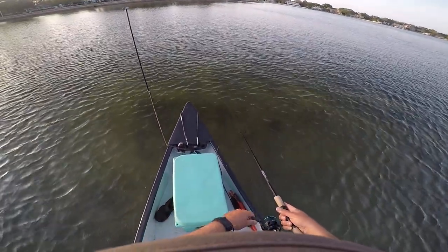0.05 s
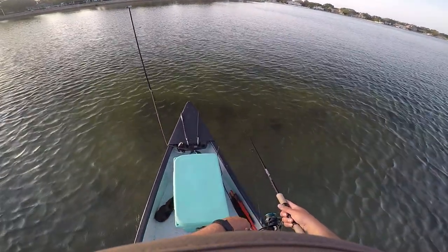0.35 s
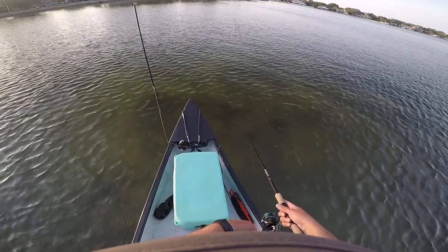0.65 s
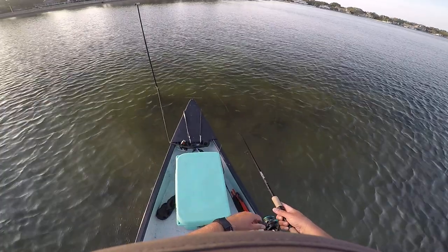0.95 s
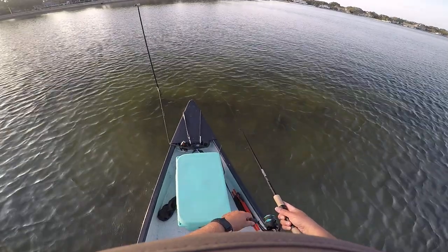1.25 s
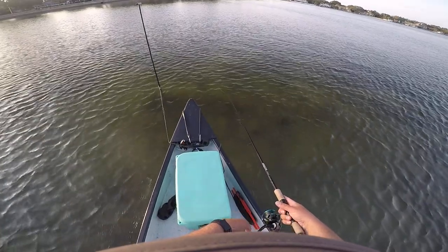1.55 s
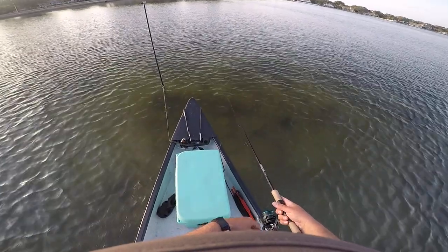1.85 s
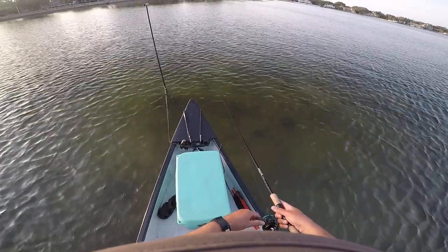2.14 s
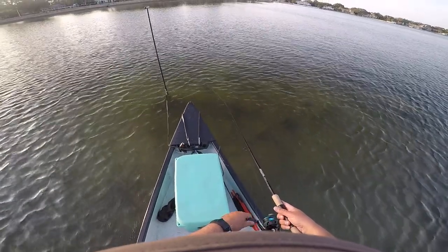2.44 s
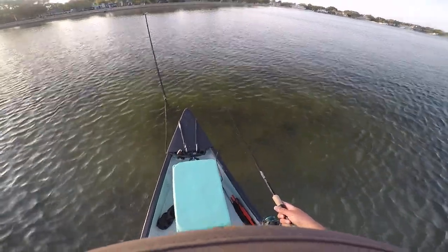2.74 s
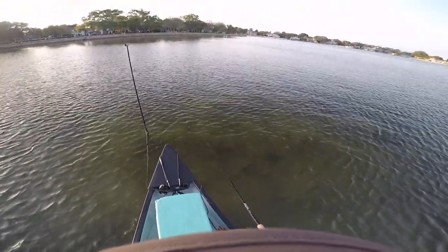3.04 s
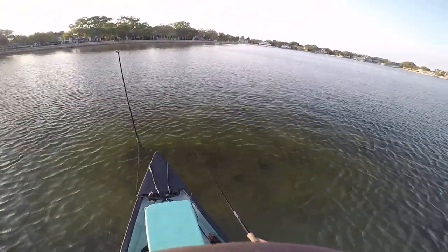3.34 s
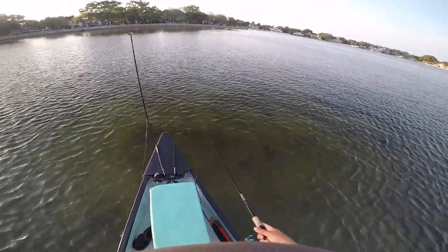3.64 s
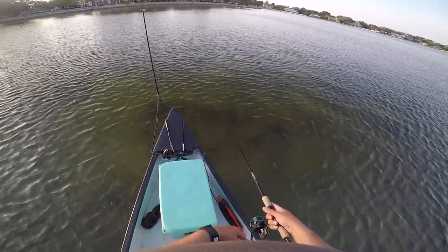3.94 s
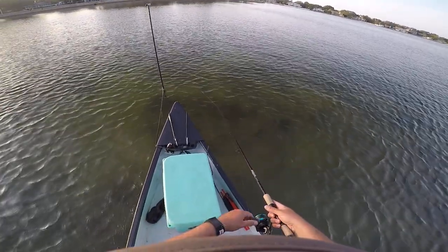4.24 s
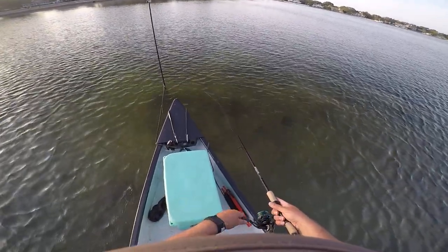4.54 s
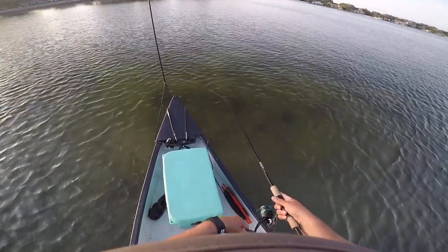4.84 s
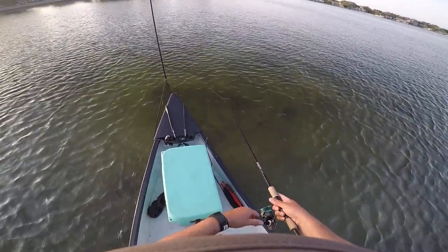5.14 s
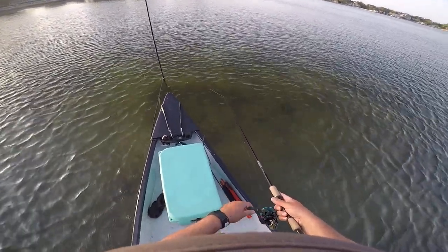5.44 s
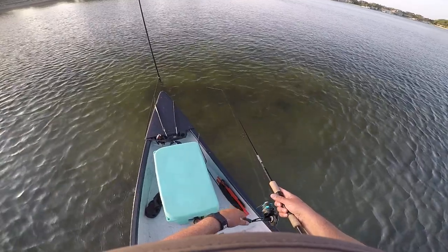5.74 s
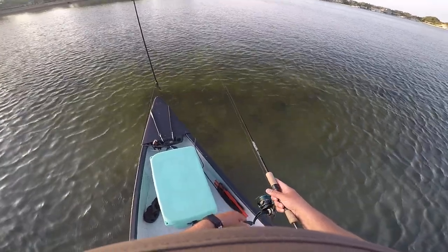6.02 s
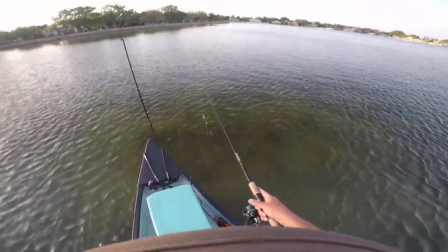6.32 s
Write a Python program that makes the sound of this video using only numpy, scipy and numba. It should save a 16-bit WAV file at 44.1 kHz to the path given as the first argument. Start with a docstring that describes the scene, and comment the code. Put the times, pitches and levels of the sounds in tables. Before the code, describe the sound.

Two gulls call close by, with more calling further off, over soft rippling water, a low drone and wind buffeting the microphone.

```python
"""Open shallow water, from a small boat: two gulls call close by, many more further off.
Each voice is a stack of syrinx harmonics coloured by throat and beak, with a faint echo off the shore.
Gusts buffet the two ports of a body-worn microphone and duck its gain; fishing tackle ticks now and then.
Underneath lies a bed of rippling water and a low, distant drone."""
import sys
import numpy as np
from scipy import signal
from scipy.fft import rfft, irfft
from scipy.io import wavfile
from scipy.ndimage import uniform_filter1d, minimum_filter1d
from numba import njit

SR = 44100
rng = np.random.default_rng(int(sys.argv[2]) if len(sys.argv) > 2 else 0)


def to_wav(sig):
    """Store sig (one row per channel, or 1-D mono) as 16-bit WAV at the path in sys.argv[1].

    Samples outside -1..1 are clipped; the rate is SR.
    """
    pcm = np.clip(np.atleast_2d(sig), -1, 1) * 32767
    pcm = np.round(pcm).astype(np.int16)
    wavfile.write(sys.argv[1], SR, pcm.T)  # frames by channels


N = 285768
TIME = np.arange(N) / SR

# hush of ripples and far shore: f/Hz, relative left level/dB, relative right level/dB
WASH_COLOUR = [(60, -77, -75.5), (256, -73.5, -71), (380, -75, -74), (570, -78, -77.5), (880, -70.5, -74.5),
               (1242, -73, -81.5), (1880, -80, -88.5), (2480, -86, -86.5), (3340, -91.5, -93),
               (5200, -94.5, -95.5), (9630, -101, -100), (10600, -103, -102), (12900, -111, -110),
               (15000, -122, -122)]
# fader ride of the drone: t/s, level/dB
DRONE_RIDE = [(0, -38.5), (.9, -38.5), (1.5, -39.5), (1.9, -38.5), (2.2, -33), (2.45, -34.5), (2.6, -41.5),
              (2.9, -31), (3.3, -34.5), (4.5, -36.5), (6.48, -41)]
# tone of the drone: f/Hz, relative level/dB
DRONE_COLOUR = [(40, -52), (95, -62), (120, -17.5), (142, 2.5), (175, 1.5), (230, -1.5), (290, -7.5),
                (370, -18.5), (600, -46.5), (2000, -100)]
# breeze between gusts: t/s, relative level/dB, eddy corner/Hz
BREEZE = [(0, -29, 145), (.6, -31.5, 128), (.9, -42, 133), (1.8, -48.5, 140), (2.65, -55, 140),
          (2.95, -37, 143), (3.3, -22, 183), (3.6, -19.5, 195), (4.1, -22, 132), (4.8, -22.5, 100),
          (5.1, -30, 104), (5.6, -25.5, 111), (6.0, -23.5, 102), (6.48, -22.5, 101)]
# gusts on the ports: t/s, length/s, relative left level/dB, relative right level/dB, eddy corner/Hz
GUSTS = [(0.39, 0.064, -49, -28, 125), (3.277, 0.12, -16.5, -36, 212), (3.39, 0.065, -24, -11.5, 233),
         (3.499, 0.031, -22, -13, 215), (3.641, 0.35, -27, -13.5, 267), (4.173, 0.029, -24, -10.5, 218),
         (4.197, 0.066, -17.5, -4.5, 295), (4.302, 0.19, -20.5, -4, 364), (4.508, 0.14, -20, -10.5, 209),
         (4.786, 0.062, -18.5, -37, 88), (5.174, 0.098, -13.5, -24, 143), (5.332, 0.043, -17.5, -34, 109),
         (5.368, 0.11, -32, -20.5, 195), (5.724, 0.074, -20.5, -12.5, 212), (5.843, 0.042, -17, -10.5, 232),
         (5.932, 0.16, -16.5, -17, 101), (6.019, 0.038, -31, -12.5, 176), (6.395, 0.035, -22, -14, 160)]
# notes of the flock: t/s, length/s, mid pitch/Hz, slide/Hz, arch above the ends/Hz, relative level/dB,
# tilt/(dB per octave), roughness/0-1, beak resonance/Hz, beak boost/dB, top edge/Hz
FLOCK_NOTES = [(-0.03, 0.1, 1038, 114, 0, -61.5, -2, .05, 4600, 8, 6000),
               (0.065, 0.074, 1063, -150, 88, -56.5, -4.5, 0.03, 5300, -3, 7000),
               (0.316, 0.045, 1027, -110, 58, -55, -6, 0.13, 3880, 4, 6000),
               (0.356, 0.079, 1015, -240, 41, -51.5, -3, 0.1, 5180, 8, 7500),
               (0.436, 0.15, 960, 104.5, 74.5, -55, -0.5, 0.18, 1900, 8, 7500),
               (1.07, 0.032, 840, -61, 8, -49, -17, .1, 2500, 3, 5000),
               (1.092, 0.056, 980, -160, 30, -50.5, 0, 0.17, 4000, -1, 6000),
               (1.12, 0.044, 781, -20, 0, -52, -8, 0, 1550, 4, 5000),
               (1.148, 0.18, 895, 16, 37, -57, -2.5, 0.17, 4570, 6, 7000),
               (1.947, 0.075, 946, -115, 33, -58.5, -8, 0.03, 2850, 2, 4200),
               (2.042, 0.096, 842, 69, 15, -57, -7, .1, 4970, 5, 5500),
               (2.114, 0.057, 978, -88, 50, -56, -12, 0.2, 2000, 3, 5500),
               (2.172, 0.095, 915, 20, 46, -61.5, -5, 0.18, 4600, 5, 5500),
               (2.277, 0.037, 1007, -130, 54, -59, 1, .15, 3050, 7, 5500),
               (2.441, 0.02, 840, 298, 0, -50, -5.5, .35, 1800, -1, 5000),
               (2.448, 0.089, 972, -95, 50, -50, -6, 0.2, 2950, 0.5, 8000),
               (2.518, 0.115, 850, -94.5, 60, -50, -4, 0.06, 2530, 7.5, 6500),
               (2.845, 0.055, 775, 3, 29, -56, -10, 0.3, 2300, 4, 3500),
               (2.982, 0.093, 815, 22, 20, -58.5, -10, 0.25, 1650, 5, 3500),
               (3.142, 0.14, 846, 19, 77, -54, -6.5, 0.15, 3300, 3, 3420),
               (3.28, 0.17, 1070, 24, 50, -62.5, -8, .03, 2150, 9, 3000),
               (3.563, 0.077, 957, -190, 3, -57.5, -5, 0.23, 4100, 9, 5000),
               (3.685, 0.15, 882, 33, 64.5, -61, -3, 0.07, 2600, 6, 4800),
               (4.34, 0.15, 855, 64, 22, -57, -7, 0.03, 3500, 4, 5500),
               (4.754, .085, 1100, -110, -3, -64, 0, 0.25, 3300, -1, 4745),
               (4.871, 0.052, 745, 90, -4.5, -58, 0, 0, 3600, 5, 4600),
               (4.935, 0.081, 997, -17, 102, -54, -3, 0.2, 4000, 4, 4800),
               (5.218, 0.053, 798, 100, -3, -53, 2, 0.1, 3250, 2, 3720),
               (5.264, 0.054, 1110, 123, 20, -57, 1, 0.5, 3830, 15, 4230),
               (5.29, 0.045, 707, -57, -31, -51.5, 7, 0.13, 1450, 9, 4000),
               (5.467, 0.05, 821, 78, 5, -54, 1, 0.13, 3300, 3, 3720),
               (5.525, 0.066, 730, -50, -12, -50.5, -1, 0.2, 1460, 4, 3500),
               (5.74, 0.07, 724, -50, -3, -48.5, -13, 0.14, 1480, 14, 3200),
               (5.96, 0.067, 748, -24, 15, -46, -24, 0.07, 3000, 13, 3200),
               (6.13, 0.048, 847, 81, 20, -54.5, -3, 0.2, 3330, 8, 3840),
               (6.169, 0.085, 1128, 5, 87, -57, 4, 0.48, 3700, 9, 4360),
               (6.348, 0.051, 854, 90, 1, -51, -1, 0.08, 3420, 4, 3630),
               (6.385, 0.1, 1136, -80, 67, -52, 6, 0.31, 3400, 0, 3840)]
# throat colour of the distant birds: f/Hz, relative level/dB
FLOCK_THROAT = [(800, -51), (1450, 8), (2000, 4), (2600, 3.5), (3300, 0), (4400, 1), (5300, 1.5),
                (6400, -12), (8000, -31)]
# close calls: yelp t/s, yelp length/s, climb length/s, droop length/s, held pitch/Hz, climb/(Hz per s),
# level/dB, fade/(dB per s), opening offset/dB, gullet boost/dB, gullet closing time/s,
# left minus right/dB, water bounce lag/s
CLOSE_CALLS = [(0.779, 0.039, 0.154, .083, 869, 396, -36, 34, 0, 21.5, 0.26, 3.5, .0023),
               (5.604, 0.041, 0.17, 0.08, 843.3, 253, -33, 5, -1.5, 16.5, 0.22, 6, .0072)]
# throat colour of the close gulls: f/Hz, first bird's relative level/dB, second bird's relative level/dB
CLOSE_THROATS = [(850, -22, -20), (1750, -8, -14.5), (2350, 2, -10), (2700, -4, -10.5), (3550, -6.5, -12.5),
                 (4450, .5, 0), (5350, 1.5, 0), (6200, -9, -13), (7100, -17, -19.5), (7900, -27, -30),
                 (8800, -34, -30), (10500, -46, -48)]
# the three parts that open a close call: start pitch/Hz, glide/(Hz per s), relative start level/dB,
# level slope/(dB per s), roughness/0-1, tilt/(dB per octave)
RASP = (690, 4500, -11, 110, 0.33, -1)
YELP = (938, -2500, 2, -60, 0.08, 0)
CATCH = (745, 1200, -8, -30, 0.14, -3)
# ticks of rod, reel and line: t/s, relative peak level/dB, ring/Hz, left minus right/dB
TACKLE_TICKS = [(1.911, -43, 5500, 1), (3.606, -37, 4870, 3), (3.940, -32.5, 4600, 3),
                (4.071, -42.5, 4360, 2), (4.553, -29, 3500, -2), (4.769, -40, 4900, 6),
                (4.917, -38, 6060, -5), (4.933, -36, 3580, -2), (5.056, -34, 5570, 6),
                (5.337, -35, 3640, -6), (5.529, -39, 5000, 16)]

RASP_S, OPENING_S = .035, .082  # the rasp leads the yelp's onset, the held note follows it
GULLET_HZ, GULLET_WIDTH_HZ = 1640, 300  # the resonance that booms in the yelp


def undb(db):
    """Decibels to gain."""
    return 10 ** (np.asarray(db) / 20)


def unit(x):
    """Scale to rms 1."""
    return x / np.sqrt(np.mean(x ** 2))


def curves(table):
    """A table's columns as straight-line automation over time."""
    times, *columns = np.transpose(table)
    return [np.interp(TIME, times, column) for column in columns]


def colour(points, hz):
    """Gain of an EQ curve (f/Hz, level/dB) at the given frequencies."""
    f, db = np.transpose(points)
    return undb(np.interp(np.log(hz + 1), np.log(f), db))


def shaped(x, gain):
    """Filter by a gain given as a function of frequency."""
    return irfft(rfft(x) * gain(np.fft.rfftfreq(x.shape[-1], 1 / SR)), x.shape[-1])


def wobble(rate_hz, size=N):
    """Smooth random modulation with a spread near 1."""
    hold = max(int(SR / rate_hz), 1)
    steps = np.repeat(rng.standard_normal(size // hold + 3), hold)
    return np.sqrt(3 / 2) * uniform_filter1d(steps, hold)[hold:hold + size]


def pan(db):
    """Left and right gains for a level difference."""
    return undb(np.array([[db], [-db]]) / 2)


def span(start, end):
    """Sample numbers between two times."""
    return np.arange(max(int(start * SR), 0), min(int(end * SR), N))


def water_wash(gain_db, swell_db, shore_hz):
    """Ripples and shore make a gently swelling hush: lows partly shared by both sides, treble wide."""
    shore = rng.standard_normal(N)
    share = lambda f: 1.19 / (1 + (f / shore_hz) ** 4)
    sides = []
    for column, lag_s in ((1, 0.00057), (2, 0.0003)):
        tone = np.array(WASH_COLOUR)[:, [0, column]]
        common = shaped(shore, lambda f: share(f) * np.exp(-2j * np.pi * f * lag_s))
        ripples = rng.standard_normal(N)
        sides.append(shaped(ripples + common, lambda f: colour(tone, f) / np.hypot(1, share(f))))
    return np.array(sides) * np.sqrt(SR / 2) * undb(gain_db + swell_db * wobble(5.09))


def distant_drone(spread, pan_db):
    """A low drone, perhaps a motor or road on the shore, nearly alike on both sides."""
    noise = rng.standard_normal(N) + spread * rng.standard_normal((2, N))
    rumble = unit(shaped(noise, lambda f: colour(DRONE_COLOUR, f)))
    return rumble * undb(curves(DRONE_RIDE)[0]) * pan(pan_db)


def airflow(attack_s=0.018, release_s=0.045, lee_dulling=0.13):
    """Level and eddy corner at each port: gusts ride on the breeze, the stronger flow sets the corner."""
    breeze_db, breeze_hz = curves(BREEZE)
    power = undb(breeze_db) ** 2
    weighted_hz = power * breeze_hz
    for start, length, left_db, right_db, corner_hz in GUSTS:
        rise = np.clip((TIME - start) / attack_s, 0, 1)
        fall = np.exp(-np.clip((TIME - start - length) / release_s, 0, 20))
        strength = undb([[left_db], [right_db]])
        gust_power = (strength * rise * fall) ** 2
        shelter = (strength / strength.max()) ** lee_dulling  # the sheltered port sounds darker
        power = power + gust_power
        weighted_hz = weighted_hz + gust_power * corner_hz * shelter
    return 10 * np.log10(power), weighted_hz / power


def port_wind(db, corner_hz, buffet_db, slope, housing_hz, housing_db):
    """Eddies rumble on one port, each size throbbing, up to a corner that climbs with the air speed."""
    centres = np.geomspace(16, 1625, 21)
    step = np.log(centres[1] / centres[0])
    out, power, buffet = 0, 0, wobble(32)
    for hz in centres:
        band = shaped(rng.standard_normal(N), lambda f: np.exp(-2 * (np.log((f + 1) / hz) / step) ** 2))
        gain = np.sqrt(hz / (1 + (31 / hz) ** 3)) / (1 + (hz / corner_hz) ** slope)
        housing_boom = undb(housing_db / (1 + (np.log2(hz / housing_hz) / 0.87) ** 2))
        gain = gain * housing_boom / (1 + (hz / 620) ** 4)
        throb = undb(buffet_db * (buffet + 0.63 * wobble(20)))
        out = out + unit(band) * gain * throb
        power = power + gain ** 2
    return out / np.sqrt(power) * undb(db)


def wind(gain_db, leak, leak_hz):
    """Each port meets its own turbulence; stereo widening leaks it across, inverted and high-passed."""
    (left_db, right_db), (left_hz, right_hz) = airflow()
    left = port_wind(left_db, left_hz, buffet_db=0.66, slope=3.7, housing_hz=200, housing_db=0.3)
    right = port_wind(right_db, right_hz, buffet_db=2.5, slope=3.65, housing_hz=222, housing_db=6.0)
    air = np.array([left, right]) * undb(gain_db)
    return air - leak * shaped(air[::-1], lambda f: f ** 2 / (f ** 2 + leak_hz ** 2))


def gull_voice(hz, rough, throat, tilt_db, flutter_db, jitter, rasp, gullet_db=0, harmonics=11):
    """Syrinx harmonics through the throat, in stereo; rough stretches jitter and double their period."""
    n = len(hz)
    hz = hz * (1 + 0.0028 * wobble(45, n) + jitter * rough * wobble(700, n))
    phase = 2 * np.pi * np.cumsum(hz) / SR
    voice, power = 0, 0
    for k in range(1, harmonics + 1):
        boom_db = gullet_db / (1 + ((k * hz - GULLET_HZ) / GULLET_WIDTH_HZ) ** 2)
        # the bounce off moving water flutters every partial, a little differently at each port
        flutter = wobble(23.3, n) + 0.47 * np.array([wobble(24.4, n), wobble(26.5, n)])
        gain = throat(k * hz) * undb(tilt_db * np.log2(k) + boom_db + flutter_db * flutter)
        voice = voice + gain * np.sin(k * phase + rng.uniform(0, 2 * np.pi))
        power = power + np.mean(gain ** 2, axis=0) / 2
    growl = .5 * np.sin(phase / 2) + wobble(1100, n)
    puffs = rng.standard_normal(n) * (1 + np.cos(phase))  # turbulent air, let through once a cycle
    breath = unit(shaped(puffs, lambda f: throat(f) / (1 + (f / 5000) ** 4)))
    return voice / np.sqrt(power) * (1 + rasp * rough * growl) + 1.4 * rough * breath


def flock(pan_db, gain_db, beak_width_hz, arch_flatness):
    """Short arched notes in the middle distance, each coloured by its beak opening, its top rolled off."""
    out = np.zeros((2, N))
    for (start, length, pitch_hz, slide_hz, arch_hz, db,
         tilt_db, rough, beak_hz, beak_db, top_hz) in FLOCK_NOTES:
        i = span(start, start + length)
        from_middle = (TIME[i] - start) / length - .5
        hz = pitch_hz + slide_hz * from_middle - arch_hz * np.abs(2 * from_middle) ** arch_flatness
        beak = lambda f: undb(beak_db / (1 + ((f - beak_hz) / beak_width_hz) ** 2))
        throat = lambda f: colour(FLOCK_THROAT, f) * beak(f) / np.hypot(1, (f / top_hz) ** 10)
        voice = gull_voice(hz, rough, throat, tilt_db, flutter_db=2.5, jitter=0.05, rasp=0.9)
        out[:, i] += voice * undb(db + gain_db) * signal.windows.tukey(len(i), .4)
    return out * pan(pan_db)


def colony(level_db, spread_db, tilt_db, count=110):
    """Gulls far across the water, dulled by distance, blur into a chatter barely above the wash."""
    out = np.zeros((2, N))
    throat = lambda f: colour(FLOCK_THROAT, f)
    for when, length, pitch, distance, side in rng.uniform(0, 1, (count, 5)):
        start = when * (N / SR - .2)
        i = span(start, start + 0.0568 + 0.1226 * length)
        arch = np.sin(np.linspace(0, np.pi, len(i)))
        hz = (680 + 300 * pitch) * (1 + 0.098 * arch)
        voice = gull_voice(hz, 0.22, throat, tilt_db, flutter_db=3.5, jitter=0.05, rasp=0.6, harmonics=5)
        out[:, i] += voice * arch * undb(level_db - spread_db * distance) * pan(8 * side)
    return out


def shore_reverb(x, t60_s, level_db):
    """Water and tree line scatter a faint, dark tail."""
    t = TIME[:SR]
    tail = rng.standard_normal((2, SR)) * undb(-60 * t / t60_s) * np.minimum(t / 0.017, 1)
    tail = unit(shaped(tail, lambda f: 1 / (1 + (f / 3500) ** 2))) / np.sqrt(SR)
    return undb(level_db) * signal.fftconvolve(x.mean(axis=0)[None], tail, axes=1)[:, :N]


def call_contour(t, yelp_s, climb_s, droop_s, held_hz, climb_hz_per_s, fade_db_per_s, opening_db,
                 droop_hz=157, droop_db=10.5, register_break_s=0.0075):
    """Pitch, level, roughness and tilt of a close call at times t from its yelp."""
    held_s = np.clip(t - OPENING_S, 0, climb_s)
    droop = np.clip((t - OPENING_S - climb_s) / droop_s, 0, 1)
    # at its end the note sags, fades and cracks, and the closing beak dulls it
    hz = held_hz + climb_hz_per_s * held_s - droop_hz * droop ** 3
    level_db = -fade_db_per_s * held_s - droop_db * droop ** 2
    controls = np.array([hz, level_db, 0.022 + 0.22 * droop ** 3, -3 * droop ** 2])
    opening = [(yelp_s, OPENING_S, CATCH), (0, yelp_s, YELP), (-RASP_S, 0, RASP)]
    for start, end, (first_hz, glide, db, db_per_s, rough, tilt_db) in opening:
        part_hz = first_hz + glide * (t - start)
        part_db = opening_db + db + db_per_s * (t - start)
        controls = np.where(t < end, np.broadcast_arrays(part_hz, part_db, rough, tilt_db), controls)
    return uniform_filter1d(controls, int(register_break_s * SR), axis=1)


def close_gulls(attack_s, water_bounce):
    """Two foreground calls: a rasp breaks upward into a yelp, dips, then holds a long arched note."""
    out = np.zeros((2, N))
    for bird, (onset, yelp_s, climb_s, droop_s, held_hz, climb_hz_per_s, gain_db, fade_db_per_s,
               opening_db, gullet_db, gullet_s, pan_db, bounce_s) in enumerate(CLOSE_CALLS):
        i = span(onset - RASP_S, onset + OPENING_S + climb_s + droop_s)
        t = TIME[i] - onset
        hz, db, rough, tilt_db = call_contour(t, yelp_s, climb_s, droop_s, held_hz,
                                              climb_hz_per_s, fade_db_per_s, opening_db)
        throat = np.array(CLOSE_THROATS)[:, [0, bird + 1]]
        boom_db = gullet_db * np.interp(t, [-attack_s, 0, gullet_s], [0, 1, 0])
        # the water mirrors the call a little late: harmonics swell and dip as they glide through the comb
        comb = lambda f: np.abs(1 + water_bounce * np.exp(-2j * np.pi * f * bounce_s))
        tone = lambda f: colour(throat, f) * comb(f)
        voice = gull_voice(hz, rough, tone, tilt_db,
                           flutter_db=2.3, jitter=0.03, rasp=0.6, gullet_db=boom_db)
        swell = np.clip((t + RASP_S) / attack_s, 0, 1) * signal.windows.tukey(len(i), .04)
        out[:, i] += voice * undb(db + gain_db) * swell * pan(pan_db)
    return out


def bank_echo(x, delay_s, level_db, dull_hz):
    """The nearest bank sends back one faint, dull slap."""
    late = np.pad(x.mean(axis=0), (int(delay_s * SR), 0))[:N]
    return undb(level_db) * shaped(late, lambda f: 1 / (1 + (f / dull_hz) ** 6))


def tackle_ticks(decay_s, width, gain_db):
    """Tiny scrapes of tackle, each a noise burst that swells and dies in one broad resonance."""
    out = np.zeros((2, N))
    for peak_s, db, ring_hz, pan_db in TACKLE_TICKS:
        i = span(peak_s - .03, peak_s + .04)
        burst = rng.standard_normal(len(i)) * np.exp(-np.abs(TIME[i] - peak_s) / decay_s)
        tick = shaped(burst, lambda f: 1 / (1 + ((f - ring_hz) / (width * ring_hz)) ** 4))
        out[:, i] += tick / np.abs(tick).max() * undb(db + gain_db) * pan(pan_db)
    return out


def scene():
    """The mix: gulls and their echoes over the bed, with wind and tackle up front."""
    near = close_gulls(attack_s=0.016, water_bounce=.25)
    far = flock(pan_db=8.5, gain_db=4, beak_width_hz=200, arch_flatness=2.42)
    far += colony(level_db=-62, spread_db=5, tilt_db=-4)
    echoes = shore_reverb(near, t60_s=.6, level_db=-22)
    echoes += bank_echo(near, delay_s=.235, level_db=-25, dull_hz=4800)
    echoes += shore_reverb(far, t60_s=1.0, level_db=-17.5)
    bed = distant_drone(spread=0.59, pan_db=-2.0) + water_wash(gain_db=1.2, swell_db=1.0, shore_hz=1290)
    gusts = wind(gain_db=-.7, leak=.38, leak_hz=220)
    tackle = tackle_ticks(decay_s=0.0012, width=0.24, gain_db=-3.5)
    return near + far + echoes + bed + gusts + tackle


@njit
def envelope(x, attack_s, release_s):
    """Level follower with separate attack and release times."""
    attack, release = 1 / (attack_s * SR), 1 / (release_s * SR)
    out, level = np.empty(len(x)), 0.
    for i in range(len(x)):
        level += (x[i] - level) * (attack if x[i] > level else release)
        out[i] = level
    return out


def record(dry, threshold=0.48, squeeze=0.74, ceiling=.88, top_hz=15000):
    """Gain control ducks the mix in the strongest gusts, a limiter catches the peaks; the top is cut."""
    peak = np.abs(dry).max(axis=0) + 1e-9
    duck = np.minimum(1, threshold / envelope(peak, attack_s=0.028, release_s=0.69)) ** squeeze
    gain = minimum_filter1d(np.minimum(duck, ceiling / peak), size=256)
    limited = dry * uniform_filter1d(gain, size=256) * signal.windows.tukey(N, .002)
    return signal.sosfilt(signal.ellip(8, .2, 70, top_hz, fs=SR, output="sos"), limited)


dry = scene()
out = record(dry)
to_wav(out)
```